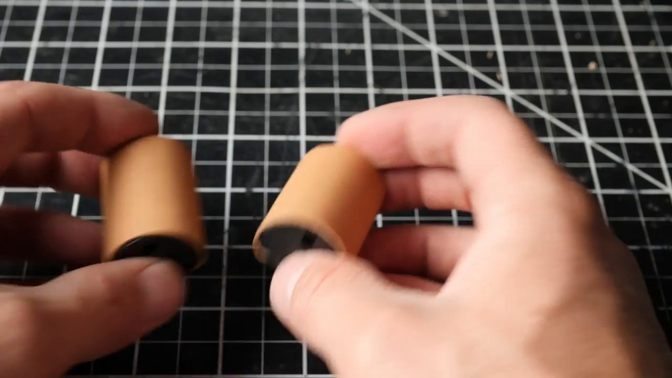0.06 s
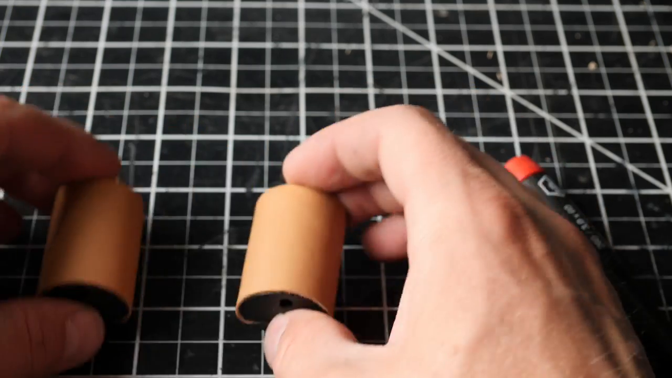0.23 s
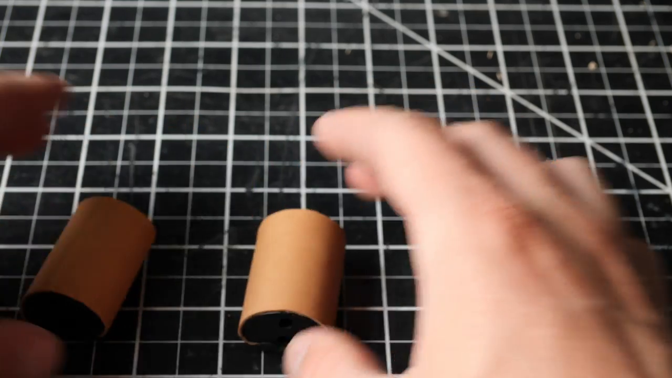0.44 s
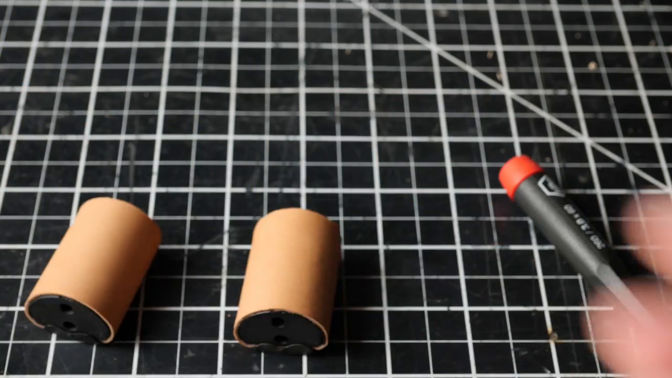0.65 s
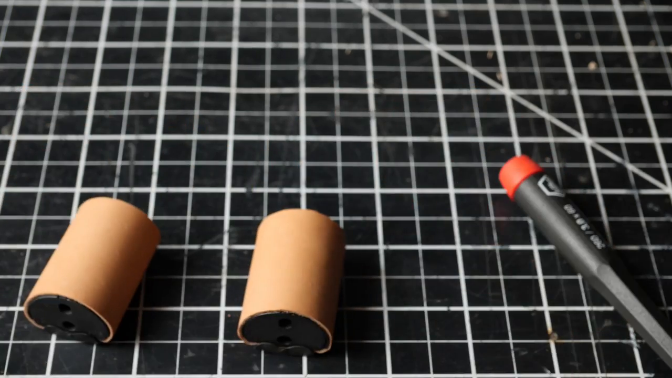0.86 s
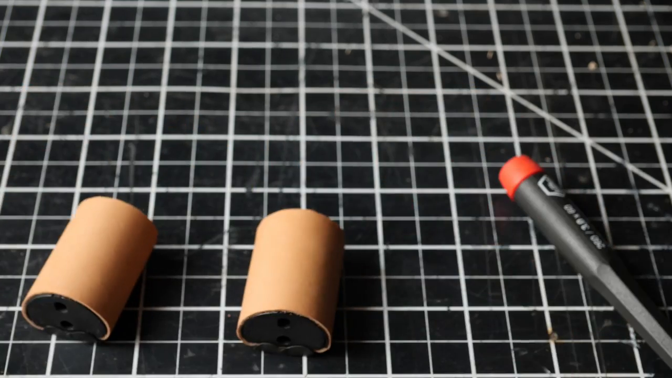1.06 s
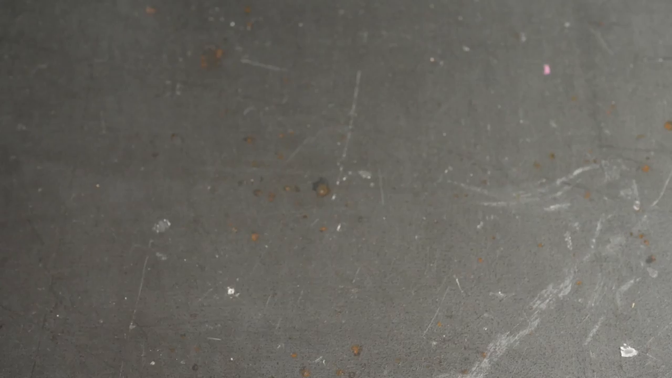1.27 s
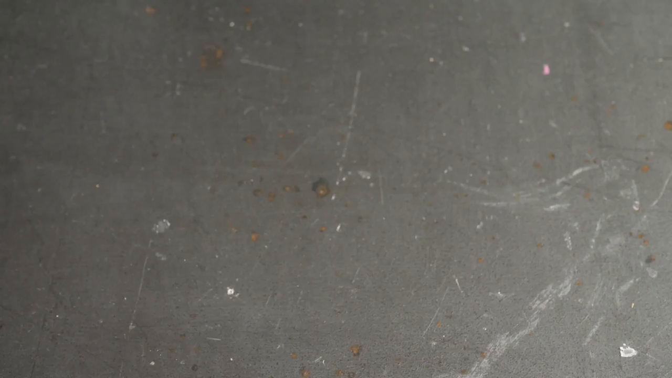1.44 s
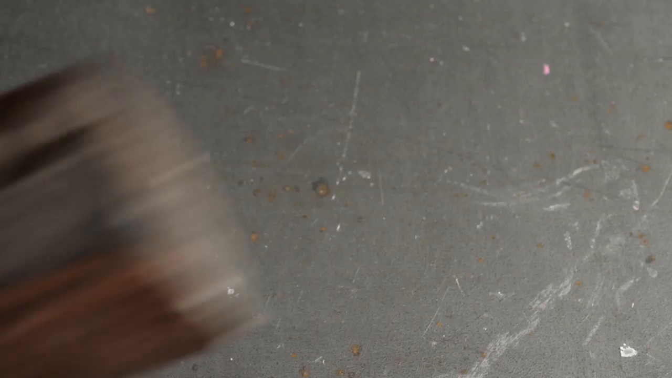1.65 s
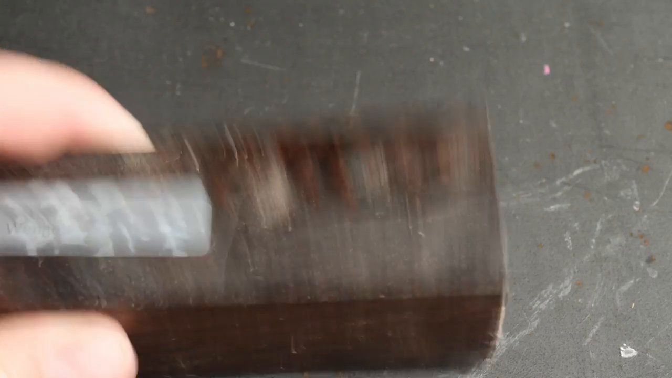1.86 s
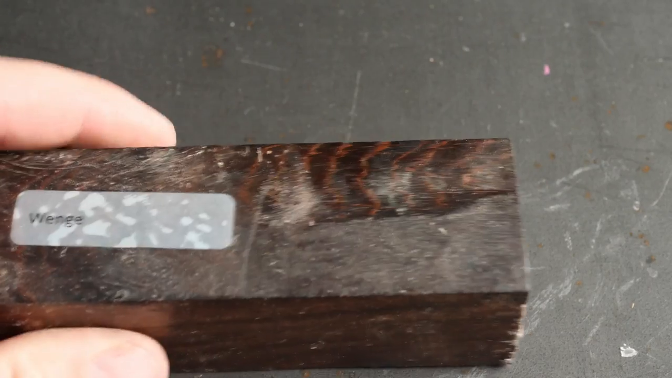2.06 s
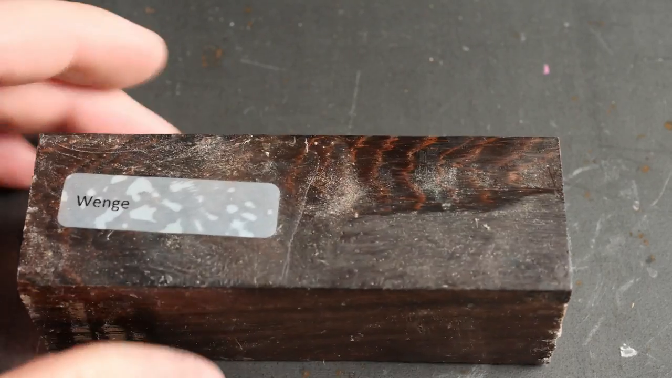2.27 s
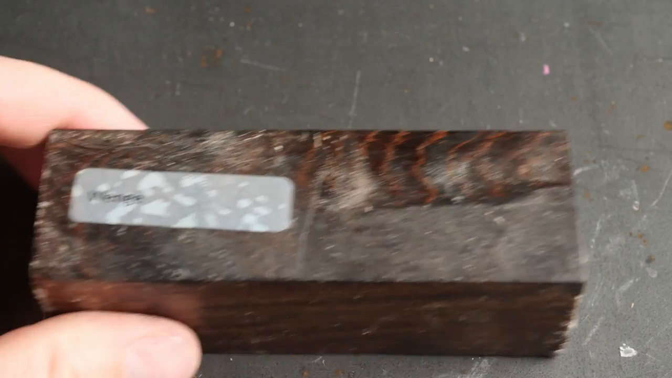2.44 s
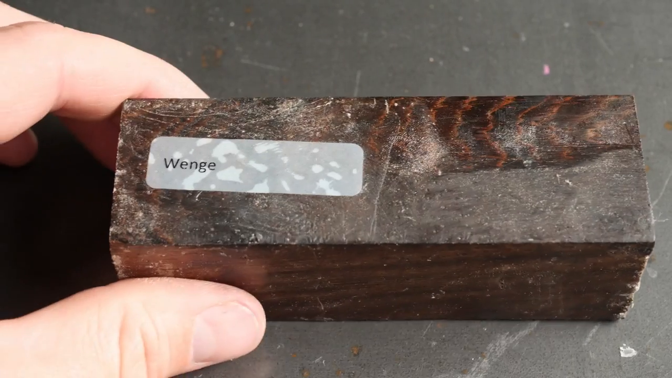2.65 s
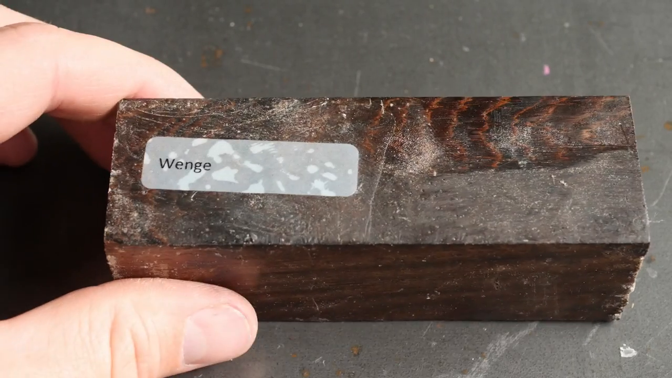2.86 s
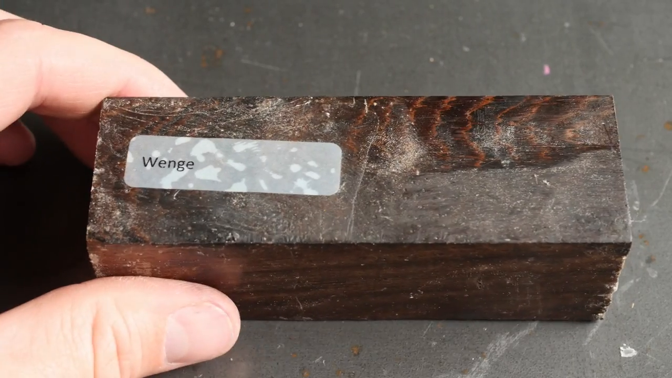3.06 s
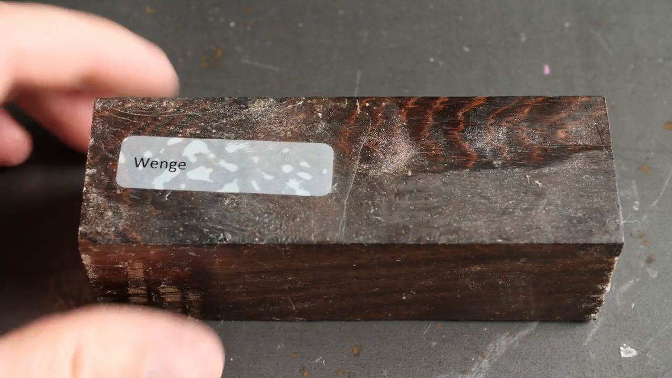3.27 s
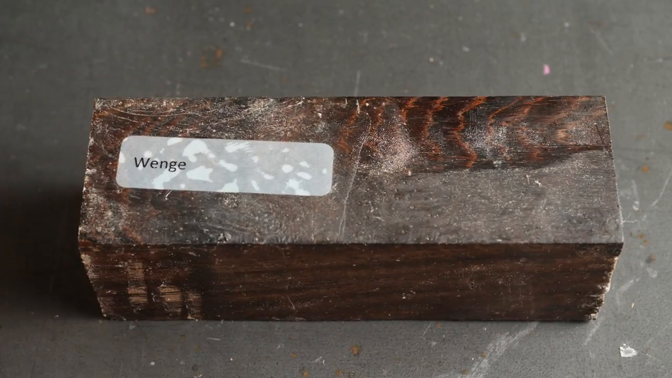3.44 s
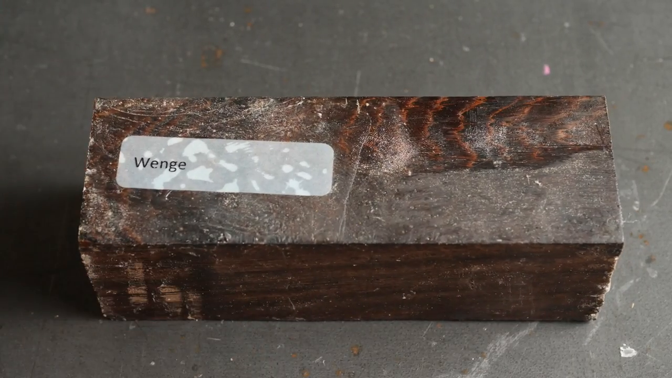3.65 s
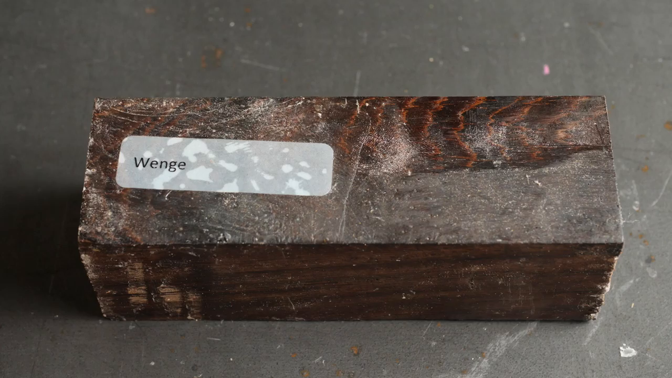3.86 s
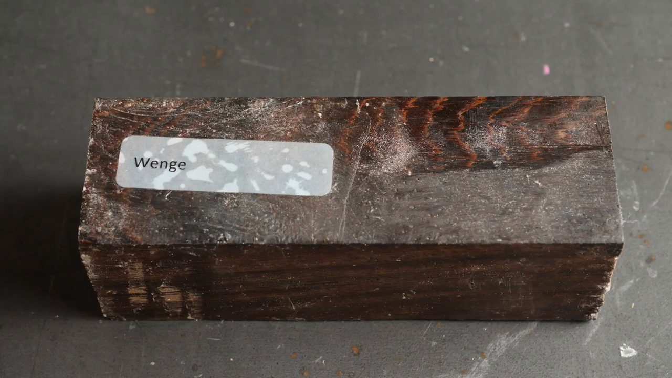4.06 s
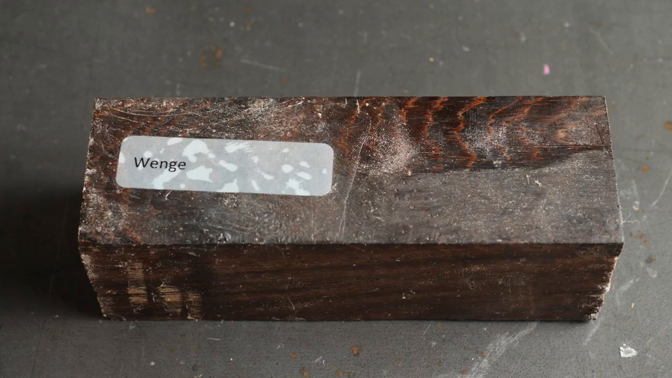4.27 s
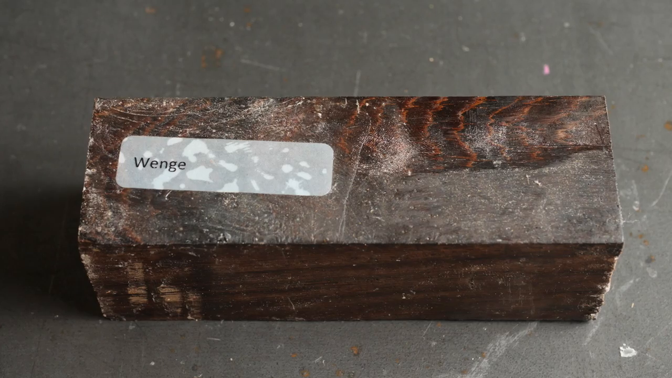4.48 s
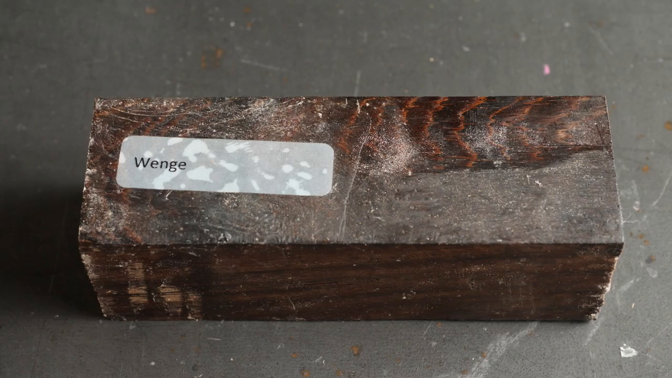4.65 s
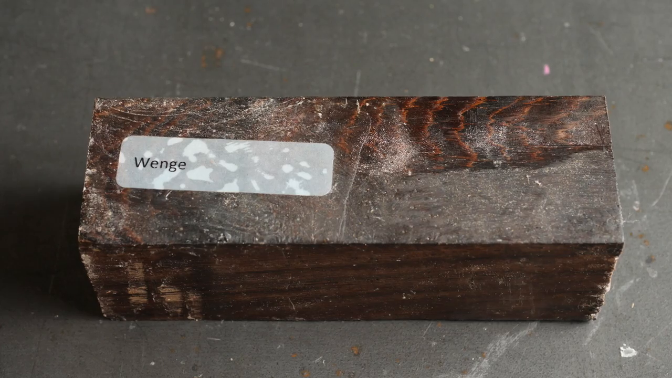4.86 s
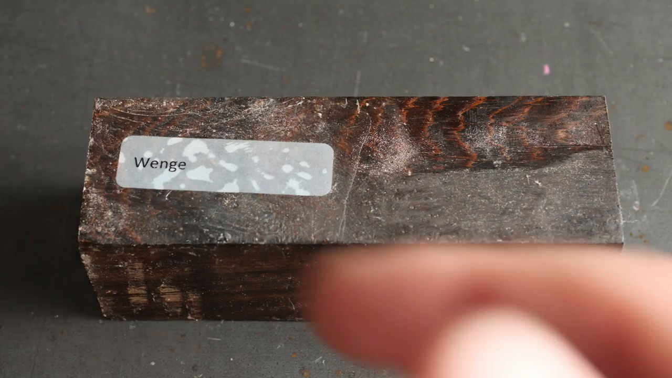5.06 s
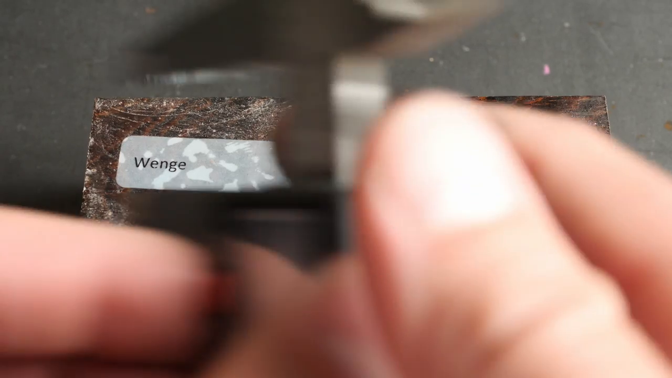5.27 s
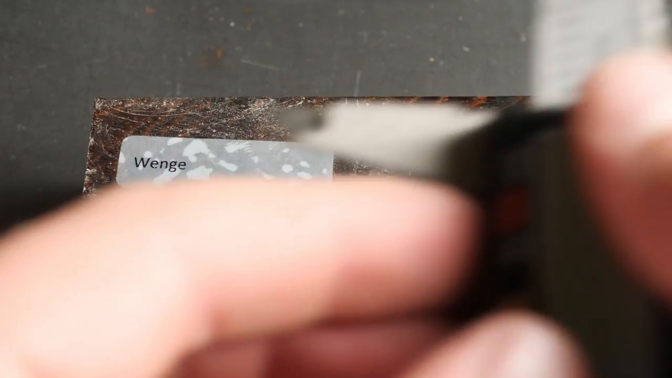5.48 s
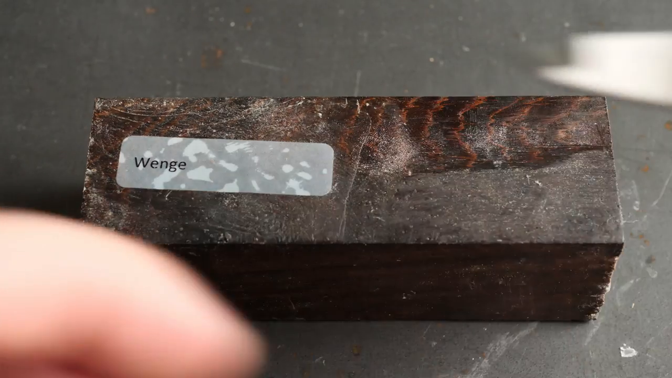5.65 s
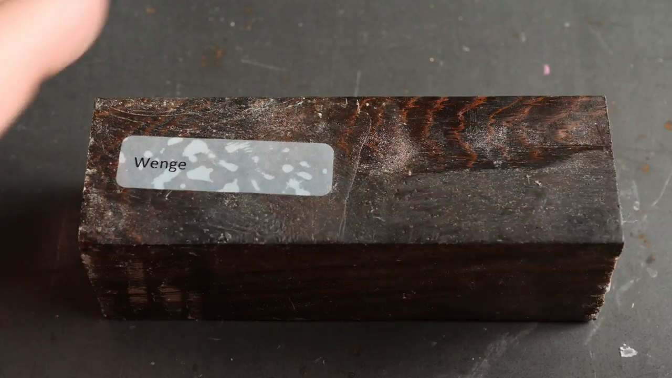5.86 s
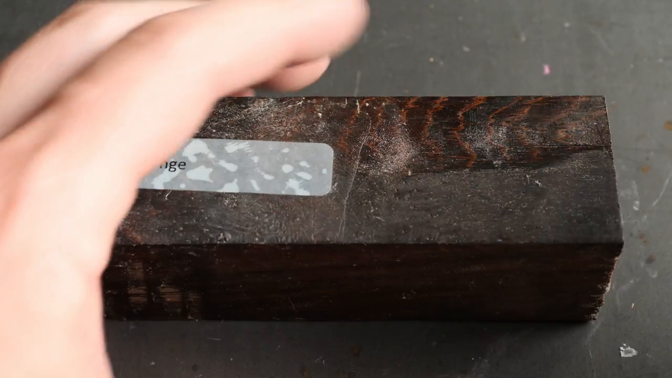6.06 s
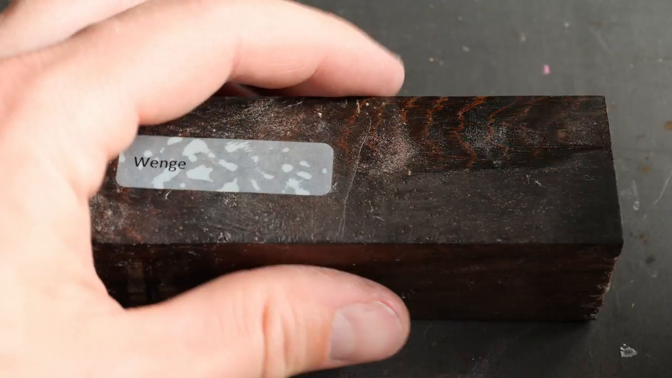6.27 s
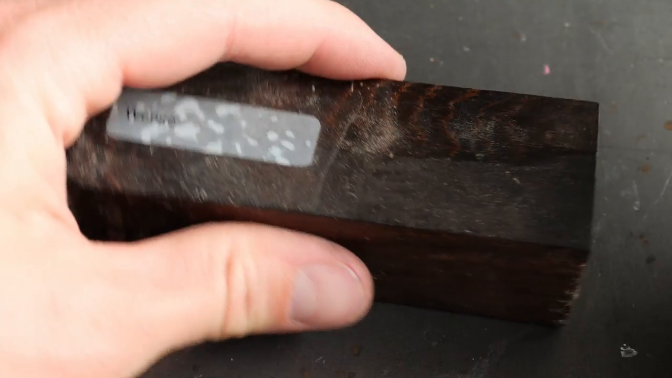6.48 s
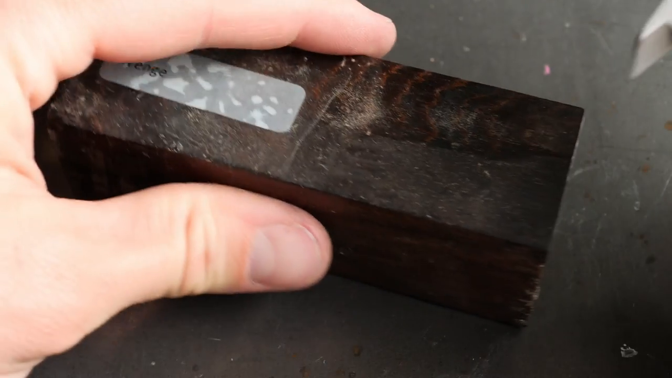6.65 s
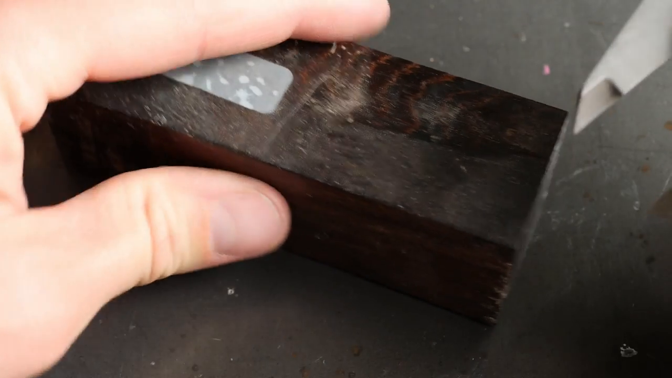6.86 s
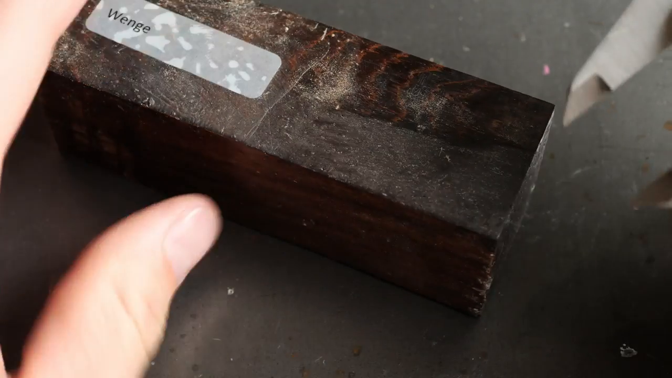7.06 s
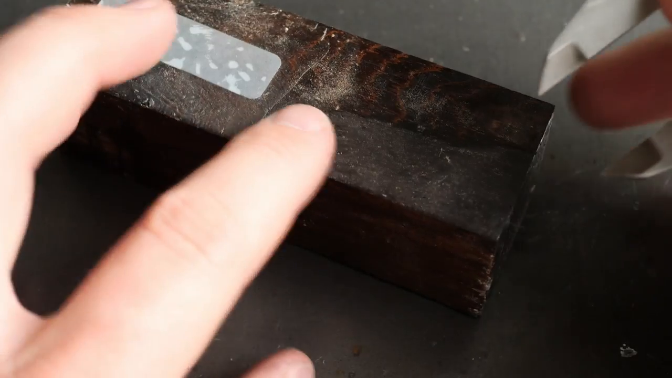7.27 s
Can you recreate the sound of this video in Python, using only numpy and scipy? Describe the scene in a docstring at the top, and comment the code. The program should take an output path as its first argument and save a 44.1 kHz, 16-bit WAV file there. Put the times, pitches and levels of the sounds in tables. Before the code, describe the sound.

A small roller knocks on a cutting mat, brief silence, then a hardwood block lands very loudly on a ringing bench, followed by light caliper scrapes, clicks and taps.

```python
"""Small things on a workbench

In a bare, ringing workshop a small roller knocks on a cutting mat and a hand brushes away.
After a short silence a hardwood block lands hard; a gain control ducks, then the room swells back.
A steel caliper is dragged, clicked and tapped over the drone of a fan.
Hits are sums of fading tones plus short noise; rubbing, fan and room are shaped noise."""
import sys
import numpy as np
from scipy import signal
from scipy.fft import rfft, irfft, next_fast_len
from scipy.io import wavfile
from scipy.ndimage import uniform_filter1d

SR = 44100
rng = np.random.default_rng(int(sys.argv[2]) if len(sys.argv) > 2 else 0)


def unload_wav(signal):
    """Save mono or channel-first audio to the path in sys.argv[1] as 16-bit WAV at rate SR, clipped to [-1, 1]."""
    wavfile.write(
        sys.argv[1],
        SR,
        np.round(np.clip(np.atleast_2d(signal).T, -1, 1) * 32767).astype(np.int16),
    )


N = 322812
TIME = np.arange(N) / SR  # seconds since the start of the scene
AGE = np.arange(SR) / SR  # seconds since a hit
SILENCE_START_S, SILENCE_END_S = 1.314, 1.5

# tones of the struck roller and block: (pitch [Hz], level [dB], time to fade by 60 dB [s])
ROLLER_TONES = [(323, -12.5, 0.043), (1110, -4, 0.042), (1380, -11, 0.048), (2300, 7.5, 0.0047),
                (3050, 0, 0.01), (4120, 6.5, 0.0064), (5100, -5, 0.0068), (7250, -6.5, 0.0037),
                (9000, -5.5, 0.0095), (10200, -3.5, 0.0035)]
BLOCK_TONES = [(526, -11.5, 0.022), (1247, -9.5, 0.033), (1828, -6, 0.031), (2310, -6.5, 0.018),
               (2500, -4.5, 0.021), (3050, -12.5, 0.031), (3440, -14.5, 0.036), (3880, -12, 0.011),
               (5900, -19, 0.011), (7950, -6, 0.0045), (9800, -24, 0.0044), (11840, -10, 0.0047)]
# colour of the boom each blow sends into the room: (pitch [Hz], level per Hz [dB])
MAT_BOOM = [(47, -66.5), (80, -33), (106, -31), (168, -13.5), (325, -5.5), (482, -13), (1110, -3.5),
            (1210, -1), (1720, -15.5), (1870, -8), (2330, -17.5), (3240, -15), (5720, -23), (8870, -29),
            (15000, -49)]
BENCH_BOOM = [(120, -58.5), (200, -32), (383, -8), (435, -15), (540, -11), (647, -13), (721, -7.5),
              (929, -7.5), (1260, -1.5), (1910, -4.5), (2060, -7.5), (3060, -11), (6300, -22), (9720, -23),
              (15000, -38)]
# tones of the bench top that hum after each blow: (pitch [Hz], level [dB])
MAT_HUM = [(118.4, -46), (285.3, -40.5), (333.8, -42), (419.9, -39), (565.2, -50), (640.6, -51),
           (812.9, -40), (893.6, -33), (1023, -37.5), (1190, -34.5), (1351, -43), (1572, -45),
           (1884, -55.5), (2175, -65.5), (2229, -51), (2433, -50)]
BENCH_HUM = [(732.1, -33), (1136, -39), (1244, -31), (1400, -32), (1620, -42), (1750, -46), (1841, -33),
             (1916, -40), (2175, -52), (2299, -34), (2466, -33.5), (2616, -47.5), (2686, -56.5),
             (2783, -57.5), (2982, -35), (3149, -49.5), (3311, -49), (3424, -47.5), (3688, -40.5),
             (4027, -44), (4199, -50.5), (4360, -47), (4710, -52), (4883, -46), (5303, -59), (5685, -51.5),
             (6406, -62.5), (6971, -58)]


def knocks():
    """The roller drops on the mat and bounces once; the heavy block grazes the bench and lands."""
    out = np.zeros((2, N))
    drop = knock(ROLLER_TONES, MAT_BOOM, MAT_HUM,
                 crack_db=-11.5, echo_db=-24, boom_db=-0.5, hum_db=-8.0, hum_t60=0.68)
    add(out, 0.4194, amp(-9.0) * drop, pan_db=0.4)
    # the table thumps under the mat
    thump = ring([(283, -1.5, 0.3), (327, 2, 0.3)], scatter_db=1)
    add(out, 0.4215, amp(-18) * thump)
    bounce = coloured(ring(ROLLER_TONES, scatter_db=3.5), [(2000, -14.5), (8000, 6.5)])
    add(out, 0.4541, amp(-27.5) * bounce, pan_db=-1.5)

    graze = ring(BLOCK_TONES, scatter_db=8.5)
    add(out, 1.9824, amp(-18.5) * graze)
    landing = knock(BLOCK_TONES, BENCH_BOOM, BENCH_HUM,
                    crack_db=-13, echo_db=-13, boom_db=-4.5, hum_db=-12, hum_t60=0.6)
    # hard on hard is bright
    bright = coloured(landing, [(800, -4.5), (2000, 0.5), (3800, 5.5), (12000, -1.0)])
    add(out, 1.9842, amp(13) * bright, pan_db=0.5)
    return out


def knock(body, boom, hum_tones, crack_db, echo_db, boom_db, hum_db, hum_t60):
    """A short woody clack; the bench top passes the blow on to the room and rings with it."""
    crack = blow(rng.standard_normal(SR) * fade(0.0094))
    clack = ring(body, scatter_db=1.0) + amp(crack_db) * crack
    room = blow(coloured(room_tail(), boom))
    # each tone reaches the two ears a little apart
    shared_phase = rng.uniform(0, 2 * np.pi, (len(hum_tones), 1, 1))
    phases = shared_phase + rng.normal(0, 0.19, (len(hum_tones), 2, 1))
    hum = np.zeros((2, SR))
    for (hz, db), phase in zip(hum_tones, phases):
        hum += amp(db) * np.sin(2 * np.pi * hz * AGE + phase)
    hum = blow(hum * fade(hum_t60) * (1 - fade(0.01)))
    return nearby(clack, echo_db) + amp(boom_db) * room + amp(hum_db) * hum


def nearby(x, echo_db):
    """A sound followed by soft copies from the things that stand around the bench."""
    delays = (rng.uniform(0.004, 0.013, 7) * SR).astype(int)
    echoes = sum(rng.choice([-1, 1]) * np.pad(x, (delay, 0))[:SR] for delay in delays)
    return x + amp(echo_db) * coloured(echoes, [(2500, 1), (8000, -20.0)])


# tones of the caliper's plastic case: (pitch [Hz], level [dB], time to fade by 60 dB [s])
CASE_TONES = [(3017, -12.5, 0.024), (5100, -10, 0.015), (5860, -9.5, 0.013), (6640, -15, 0.0055),
              (7270, -5.5, 0.012), (8560, -2, .01), (9040, -20, 0.0091), (8800, -0.5, 0.0079),
              (10750, 0.5, 0.0054), (11520, 2, 0.0096), (12100, -11, 0.012), (12600, -16, .005),
              (14400, -2, 0.006)]
# dry clicks of the case: (time [s], level [dB], left over right [dB])
CLICKS = [(5.2729, -22.5, 2.5), (5.8823, -50, -2), (5.9122, -51, -4), (5.9306, -28.5, -4),
          (6.0159, -31.5, -4), (6.322, -25.5, 5), (6.336, -29.5, -5), (6.341, -32, -7), (6.3504, -31, 0),
          (7.1086, -27.5, -7.5)]


def clicks():
    """The caliper's case snaps; each sharp edge fills the room and the ceiling returns the snap."""
    out = np.zeros((2, N))
    for s, db, pan_db in CLICKS:
        noise = rng.standard_normal(SR) * fade(0.0095)
        edge = blow(coloured(noise, [(1000, -12), (3000, -3.0), (8000, 4.5), (15000, -4.0)]))
        case = ring(CASE_TONES, scatter_db=1.5)
        snap = amp(db) * (case + amp(-7) * edge)
        add(out, s, snap + amp(db - 10.0) * in_room(edge), pan_db)
        add(out, s + 0.01, amp(-20) * snap)  # back from the ceiling
    return out


# steel touching the bench: (time [s], level [dB], relative thud [dB], treble tilt [dB],
# relative room and beam [dB], rattle's time to fade by 60 dB [s], left over right [dB])
TAPS = [(4.1328, -30.5, -0.5, -9.5, 4, 0.048, 1), (4.2241, -41, 10, -1.5, 10, 0.037, 3),
        (4.4845, -44.5, 20, -6.5, 0.5, 0.095, 2), (4.6497, -34.5, 9.5, -8.5, -11.5, 0.076, 5),
        (5.321, -34, -6, 1, -18, 0.042, 13), (5.324, -22, -18, -1.5, -6, 0.11, 0),
        (6.3196, -35.5, -5, -3, 8.5, 0.027, -1), (6.321, -24, -9, 5.5, -14.5, 0.032, -3.5),
        (6.7815, -58.5, 2, -28, 2, .03, -2), (7.1087, -27.5, -9, 1.5, -3.5, 0.14, 0.5)]
# hollow note of the bench under a tap: (pitch [Hz], level [dB], time to fade by 60 dB [s])
HOLLOW_TONES = [(376, -2.5, 0.39), (459, -5.5, .15), (646, 3, 0.11), (736.6, 0.5, 0.36), (1320, 4.5, 0.3),
                (1880, 6.5, 0.1)]


def taps():
    """Steel meets the bench: a brief rattle with a thud below it, and the beam rings on."""
    out = np.zeros((2, N))
    thud_colour = [(150, -43), (380, 10.5), (750, -5.0), (1300, 9.5), (2200, 0.0), (4000, -46)]
    for s, db, thud_db, treble_db, room_db, t60, pan_db in TAPS:
        chatter = rng.standard_normal(SR) * fade(t60) * (1 - fade(0.00055))
        # a harder contact is brighter
        hardness = [(4500, 0.6), (7500, treble_db - 1.0), (10500, treble_db),
                    (15000, 2.4 * treble_db - 10.5)]
        steel = blow(coloured(chatter, [(800, -35.5), (2200, -4.5)] + hardness))
        thud = blow(coloured(chatter, thud_colour))
        hollow = ring(HOLLOW_TONES, scatter_db=4.5)
        rattle = steel + amp(thud_db - 10.0) * (amp(2.5) * thud + amp(-2) * hollow)
        beam = amp(-3.5) * coloured(steel_ring(scatter_db=3.5), hardness)
        ringing = amp(-1.0) * in_room(rattle) + beam
        add(out, s, amp(db) * (rattle + amp(room_db) * ringing), pan_db)
    return out


# tones of the caliper's steel beam: (pitch [Hz], level [dB], time to fade by 60 dB [s])
STEEL_TONES = [(1430, -12, .4), (2170, -8, .35), (2290, -6, .4), (3180, -6, .3), (3680, -8, .3),
               (3930, -6, .25), (4226, -3, .3), (4360, -6, .4), (4650, -5, .22), (5141, -8, .3),
               (5715, -5, .25), (6428, -8, .3), (6955, -5, .27), (7620, -8, .3), (8080, -9, .35),
               (8400, -7, .8), (8909, -8, .55), (9534, -6, .65), (9841, -8, .4), (10280, -9, .4),
               (10870, -6, .45), (11060, -8, .4), (12020, -7, .32), (12330, -9, .35), (13450, -8, .42)]


def steel_ring(scatter_db):
    """One ring of the beam: its many high tones fade slowly, as little is lost inside steel."""
    return ring(STEEL_TONES, scatter_db)


def through_beam(x):
    """The steel beam's ring when it is rubbed: every slip sets it ringing anew."""
    return signal.fftconvolve(x, unit(steel_ring(scatter_db=2.5)) / np.sqrt(SR))[:N]


# colour of the scraping grit: (pitch [Hz], level per Hz [dB])
DRAG_COLOUR = [(410, -50.5), (700, -38), (1150, -39), (1480, 4.5), (1760, -35.5), (1950, 1), (2190, 2.5),
               (2690, -7), (3270, -8), (3920, 1.5), (4640, -3.5), (9850, -5.5), (15500, -23)]
# the caliper dragged: (time of hardest press [s], time from then to lift-off [s],
# relative level [dB], treble [dB], easing [dB per s])
DRAGS = [(4.294, 0.14, -18, -10, 403), (4.726, 0.083, -15, -6, 134)]
PRESS_DB_PER_S, LIFT_DB_PER_S = 300, 1200  # how fast a drag swells, and dies once lifted
LIGHT_DB = -44.5  # floor of the easing, before the mix: steel sliding with no pressure on it
BRIGHTEN_DB, BRIGHTEN_S = 18, 0.036  # treble gained as the pressure eases, and how soon


def drag():
    """The caliper scrapes the bench: pressed ever harder, then easing and brightening until it lifts."""
    grit = friction(DRAG_COLOUR, rough_db=1.5)
    dull = coloured(grit, [(1400, 5.5), (2400, 4), (3900, -0.5), (5200, 0.5),
                           (8000, -5.0), (11000, -13.5), (15000, -17)])
    scrape = np.zeros(N)
    for s, slide_s, db, treble_db, ease_db_per_s in DRAGS:
        before = np.maximum(s - TIME, 0)
        after = np.maximum(TIME - s, 0)
        lifted = np.maximum(after - slide_s, 0)
        sliding_db = np.maximum(db - ease_db_per_s * after, LIGHT_DB)
        level_db = sliding_db - PRESS_DB_PER_S * before - LIFT_DB_PER_S * lifted
        bright_db = treble_db + BRIGHTEN_DB * (1 - np.exp(-after / BRIGHTEN_S))
        scrape += amp(level_db) * (dull + amp(bright_db) * (grit - dull))
    return amp(-9) * scrape + amp(-9) * in_room(scrape) + amp(-17) * through_beam(scrape)


# colour of skin on a surface: (pitch [Hz], level per Hz [dB])
SKIN_COLOUR = [(1500, -16.5), (2000, -10), (3200, -5), (4400, -2), (5400, -1), (7000, 0.5), (10000, 3),
               (13000, -3.5), (15500, -9.5)]
# skin brushing over mat, wood and bench: (start [s], length [s], level before the mix [dB])
BRUSHES = [(.03, 0.19, -49), (.76, 0.057, -49.5), (.855, 0.097, -38), (1.01, 0.32, -45), (2.375, 0.11, -46),
           (2.61, .15, -48.5), (3.33, 0.31, -41), (3.55, 0.56, -54), (5.5, 0.99, -52), (5.97, .33, -48.5),
           (6.5, 0.46, -54), (6.97, 0.44, -43)]
# the block pushed over the bench: (start [s], length [s], level before the mix [dB])
SHOVES = [(2.51, 0.26, -30.5), (6.49, 0.17, -46), (6.66, 0.13, -40), (6.965, 0.079, -38.5),
          (7.26, .14, -42)]
NOTE_START_S, NOTE_LENGTH_S = 3.735, 0.36  # a faint rubbing note
NOTE_DB, NOTE_HZ = -39, 531.4


def handling():
    """Skin brushes the surfaces, the block is nudged along, and something rubs with a faint note."""
    skin = strokes(BRUSHES) * friction(SKIN_COLOUR, rough_db=1.5)
    wood = strokes(SHOVES) * friction(BENCH_BOOM, rough_db=2.5)
    rubbing = skin + wood
    steel = through_beam(skin * (TIME > SILENCE_END_S))  # the beam rings only after the silence
    note = amp(NOTE_DB) * stroke(NOTE_START_S, NOTE_LENGTH_S) * np.sin(2 * np.pi * NOTE_HZ * TIME)
    return amp(-9.5) * rubbing + amp(-10.5) * in_room(rubbing) + amp(-14.0) * steel + note


def friction(colour, rough_db):
    """Tiny slips of uneven size, about a millisecond apart."""
    slips = unit(uniform_filter1d(rng.standard_normal(N), size=60))
    return unit(coloured(rng.standard_normal(N) * amp(rough_db * slips), colour))


def stroke(start, length):
    """The gain of one smooth movement: a half sine from rest to full speed and back."""
    return np.sin(np.pi * np.clip((TIME - start) / length, 0, 1))


def strokes(rows):
    """The gain of a series of movements: (start [s], length [s], level [dB])."""
    return sum(amp(db) * stroke(start, length) for start, length, db in rows)


# a thin airy whistle that arches up and down again: (time of the top [s], relative level [dB])
WHISTLES = [(1.121, -58), (3.76, -61)]
# the arch: its top, its drop to either end, half its length
WHISTLE_TOP_HZ, WHISTLE_SAG_HZ, WHISTLE_HALF_S = 12800, 6200, 0.17
WHISTLE_FORMANT_HZ, WHISTLE_WIDTH_HZ = 9800, 1000  # loudest as it passes this resonance


def whistle():
    """A narrow band of hiss whose pitch arches through a fixed resonance."""
    band = unit(coloured(rng.standard_normal(N), [(200, 5), (700, -29), (2000, -74.5)]))
    out = np.zeros(N)
    for s, db in WHISTLES:
        drop = np.minimum(((TIME - s) / WHISTLE_HALF_S) ** 2, 1)
        hz = WHISTLE_TOP_HZ - WHISTLE_SAG_HZ * drop
        resonance = 1 / np.hypot(1, (hz - WHISTLE_FORMANT_HZ) / WHISTLE_WIDTH_HZ)
        carrier = np.sin(2 * np.pi * np.cumsum(hz) / SR)
        out += amp(db) * np.sqrt(1 - drop) * resonance * unit(band * carrier)
    return out


# colours of the air before the silence and of the fan after it: (pitch [Hz], level per Hz [dB])
QUIET_COLOUR = [(18, -81.5), (30, -66), (85, -40.5), (105, -15.5), (237, -18.5), (359, -12), (561, -18),
                (1720, -25.5), (2020, -21), (2360, -31.5), (3780, -35), (5040, -29), (6210, -37),
                (9680, -36), (15500, -38.5)]
FAN_COLOUR = [(18, -77), (30, -47), (140, -0.5), (243, -7), (359, -11.5), (518, -9.5), (575, -12),
              (1080, -9.5), (1820, -15.5), (2130, -24.5), (2420, -23.5), (4540, -33.5), (7650, -39),
              (8500, -39), (15500, -46)]
# resonances of the fan: (pitch [Hz], half-width [Hz], relative level [dB])
FAN_PEAKS = [(137.7, 8.3, -44.5), (181, 15, -59), (120.5, 4.7, -57.5), (204.6, 39, -60.5), (243, 15, -55),
             (532, 12, -51), (740, 110, -46), (1076, 144, -46)]
# swells of a hollow low rush: (start [s], length [s], level added to the steady rush [dB])
RUSHES = [(-.15, .45, -60.5), (1.0, .38, -46.5)]
RUSH_DB = -60  # level of the rush between the swells


def background():
    """Quiet air with a hollow rush at first; later a fan droning in its resonances."""
    air = unit(coloured(diffuse(N), QUIET_COLOUR))
    hollow = unit(coloured(diffuse(N), [(50, -57.5), (150, -21.5), (290, -5.0),
                                        (400, 0.0), (600, -26.5), (1500, -61.0)]))
    quiet = amp(-54.5) * air + (amp(RUSH_DB) + strokes(RUSHES)) * hollow
    rush_of_fan = unit(ragged(coloured(diffuse(N), FAN_COLOUR), depth_db=2.5, width_hz=22))
    drone = unit(filtered(diffuse(N), fan_resonances))
    fan = amp(-43.5) * rush_of_fan + amp(-47.0) * drone
    return np.where(TIME < SILENCE_START_S, quiet, fan)


def fan_resonances(f):
    """The fan's response to each pitch: a flat-topped peak at every resonance."""
    return sum(amp(db) / np.sqrt(width) / (1 + ((f - hz) / width) ** 4)
               for hz, width, db in FAN_PEAKS)


# how long the room rings: (pitch [Hz], time to fade by 60 dB [s])
ROOM_FADE = [(150, 0.47), (1000, 0.66), (2500, 0.63), (5000, 0.46), (10000, 0.37), (15000, 0.4)]


def room_tail():
    """The workshop's uneven answer, of energy 1: noise that fades at its own rate at each pitch."""
    hz, t, z = signal.stft(diffuse(SR), SR, nperseg=256)
    decay = np.exp(-np.log(1000) * t / along(ROOM_FADE, hz)[:, None])
    tail = signal.istft(z * decay, SR, nperseg=256)[1][:, :SR]
    tail = ragged(tail, depth_db=4, width_hz=45)
    return unit(tail * (1 - fade(0.0077))) / np.sqrt(SR)


def in_room(x):
    """The room's answer to a mono sound."""
    return signal.fftconvolve(x[None], room_tail(), axes=1)[:, :len(x)]


# stereo width of sound from all around: (pitch [Hz], side over mid [dB])
WIDTH = [(100, -44.5), (250, -23), (500, -19.5), (1000, -9.5), (4000, -7), (15000, -9)]


def diffuse(size):
    """White stereo noise, nearly mono in the bass."""
    mid, side = rng.standard_normal((2, size))
    side = coloured(side, WIDTH)
    return np.array([mid + side, mid - side])


def ring(modes, scatter_db):
    """Fading tones of alternating sign, struck at slightly new strengths each time."""
    sway = np.zeros(SR)
    for k, (hz, db, t60) in enumerate(modes):
        strength = (-1) ** k * amp(db + scatter_db * rng.normal())
        sway += strength * fade(t60) * np.sin(2 * np.pi * hz * AGE)
    return blow(sway * (1 - fade(0.0015)))


def fade(t60):
    """Exponential decay over one second; t60 is the time [s] to fade by 60 dB."""
    return np.exp(-np.log(1000) * AGE / np.maximum(t60, 1e-4))


def ragged(x, depth_db, width_hz):
    """x through many narrow peaks and dips, as panels and cavities give."""
    knots = rng.standard_normal(SR)

    def response(hz):
        return amp(depth_db * np.clip(np.interp(hz / width_hz, np.arange(SR), knots), -2, 2))

    return filtered(x, response)


def coloured(x, points):
    """x through a spectrum: (pitch [Hz], gain [dB])."""
    return filtered(x, lambda hz: amp(along(points, hz)))


def filtered(x, response):
    """x times a response of frequency."""
    n = x.shape[-1]
    padded = next_fast_len(n + 8192)
    return irfft(rfft(x, padded) * response(np.fft.rfftfreq(padded, 1 / SR)), padded)[..., :n]


def along(points, hz):
    """Values read between (pitch [Hz], value) points on a log pitch axis."""
    f, v = np.transpose(points)
    return np.interp(np.log(hz + 1), np.log(f), v)


def amp(db):
    """Decibels to gain."""
    return 10 ** (np.asarray(db) / 20)


def unit(x):
    """Scale to rms 1."""
    return x / np.sqrt(np.mean(x ** 2) + 1e-20)


def blow(x):
    """Scale a one-second hit to the energy of ten milliseconds at rms 1."""
    return unit(x) / 10


def add(track, s, sound, pan_db=0):
    """Mix a sound into a stereo track at time s; positive pan_db leans left."""
    start = round(s * SR)
    part = (sound * amp([[pan_db / 2], [-pan_db / 2]]))[:, :N - start]
    track[:, start:start + part.shape[1]] += part


def scene():
    """Everything on and around the bench; a low cut at 105 Hz thins the bass of hits and rubbing."""
    things = knocks() + clicks() + taps() + drag() + handling()
    # the jaws ping as they snap together
    ping = ring([(9600, -6, 0.036), (11500, -3, 0.012)], scatter_db=0.5)
    add(things, 6.3224, amp(-20) * ping, pan_db=-5.0)
    # the firmest tap draws a low note from the bench
    low_note = ring([(636, 0, 0.11), (732, 0, 0.28)], scatter_db=0.5)
    add(things, 5.324, amp(-32.5) * low_note)
    low_cut = signal.butter(4, 105, "high", fs=SR, output="sos")
    return signal.sosfilt(low_cut, things) + whistle() + background()


def gain_control(x, threshold_db, share, release_db):
    """Takes away a share of the excess of a loud blow at once, then recovers by release_db a second."""
    power = np.abs(uniform_filter1d(np.mean(x ** 2, axis=0), size=130))
    over = np.maximum(10 * np.log10(power + 1e-12) - threshold_db, 0) * share
    held = np.maximum.accumulate(over + release_db * TIME) - release_db * TIME
    return x * amp(-uniform_filter1d(held, size=30))


TOP_HZ = 15900  # almost nothing is heard above this


def record(dry):
    """Gain control, full-scale clipping, a silent gap and a steep treble limit."""
    controlled = gain_control(dry, threshold_db=-13.5, share=0.75, release_db=116.5)
    clipped = np.clip(controlled, -1, 1)
    live = (TIME < SILENCE_START_S) | (TIME > SILENCE_END_S)
    gate = uniform_filter1d(live * 1.0, size=100)  # short ramps at the edges of the gap
    return filtered(clipped * gate, lambda hz: 1 / np.sqrt(1 + (hz / TOP_HZ) ** 120))


dry = scene()
out = record(dry)
unload_wav(out)
```